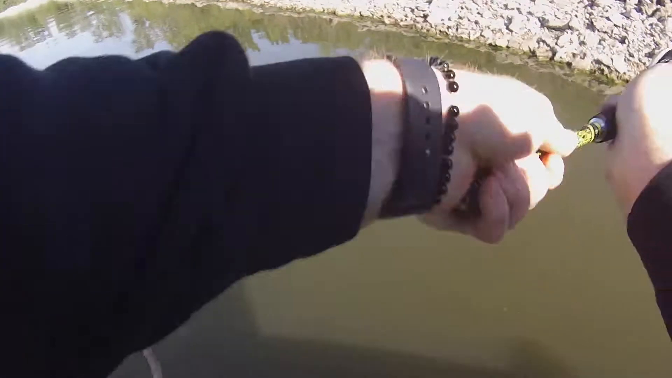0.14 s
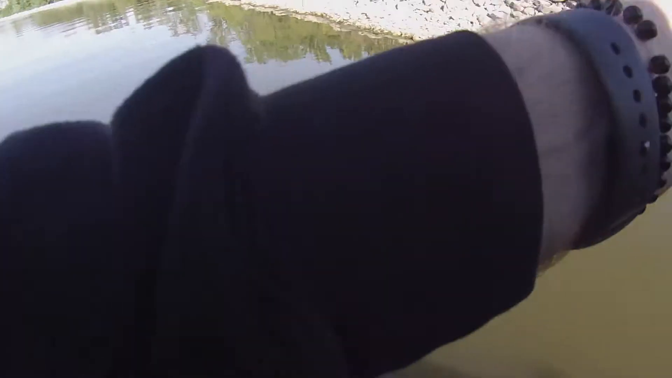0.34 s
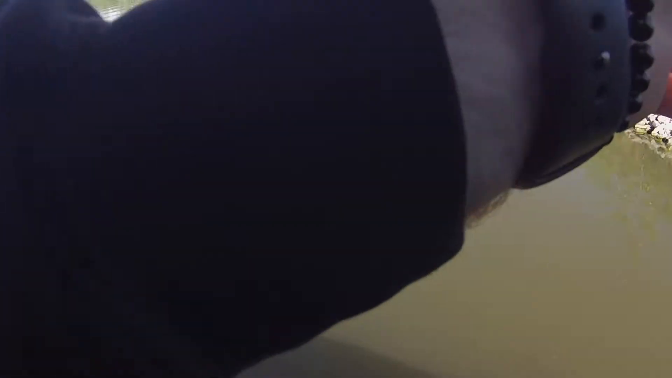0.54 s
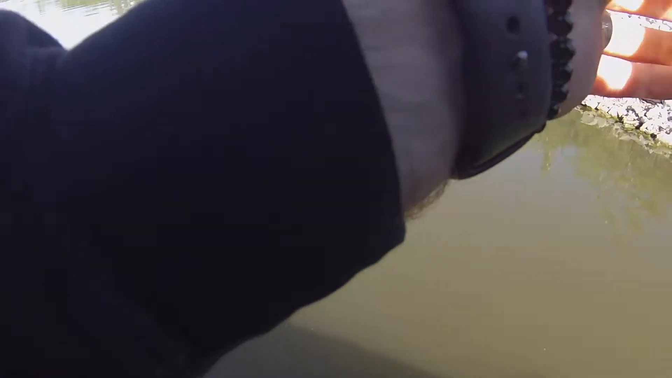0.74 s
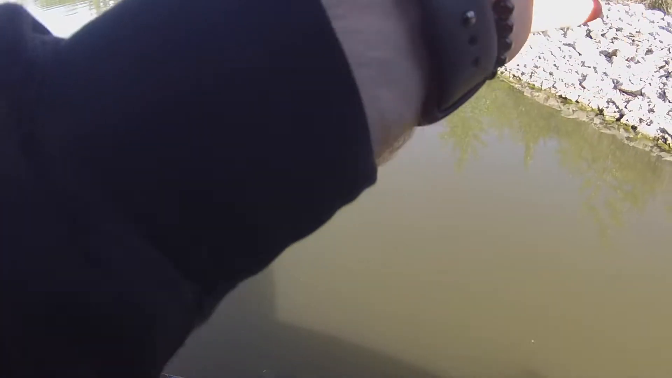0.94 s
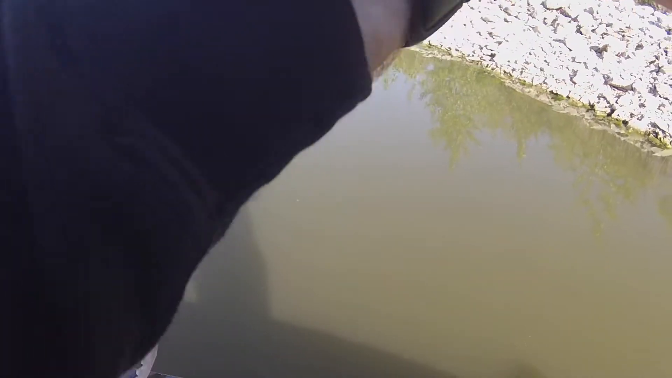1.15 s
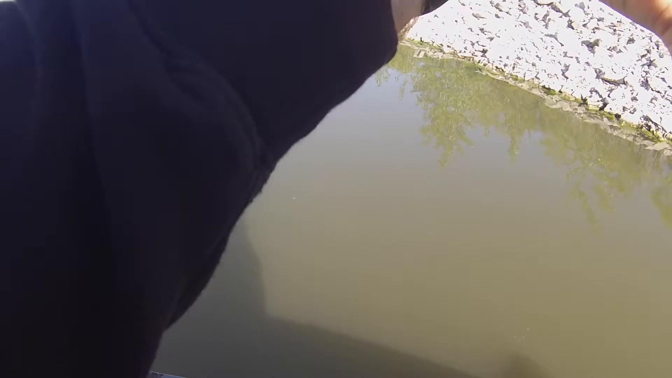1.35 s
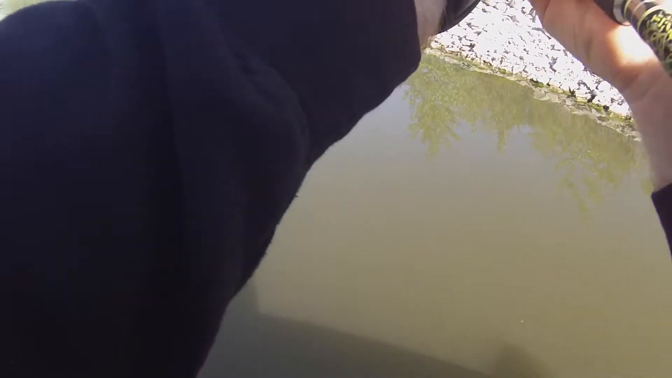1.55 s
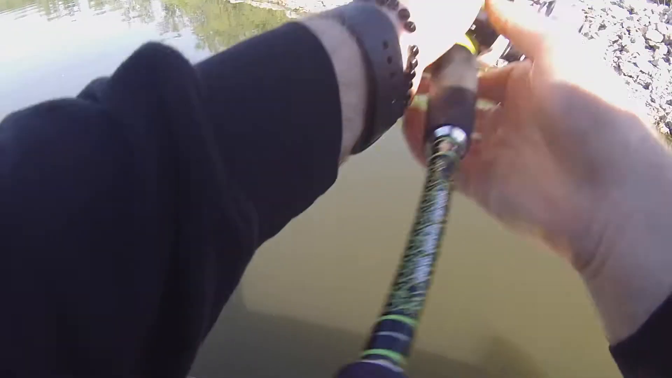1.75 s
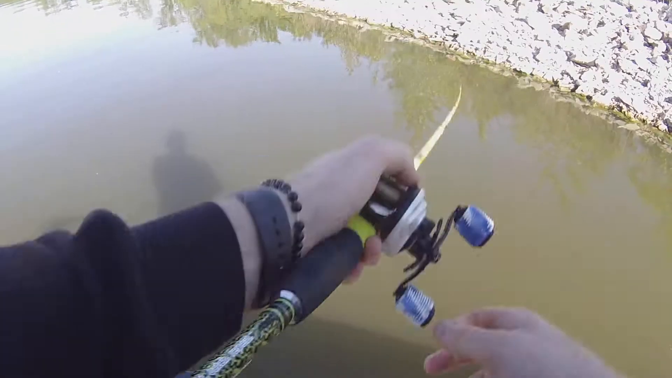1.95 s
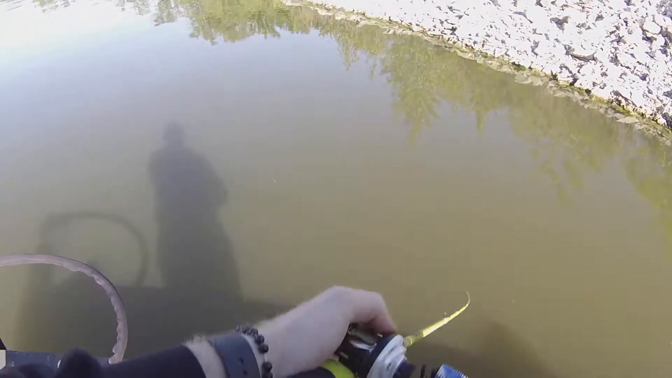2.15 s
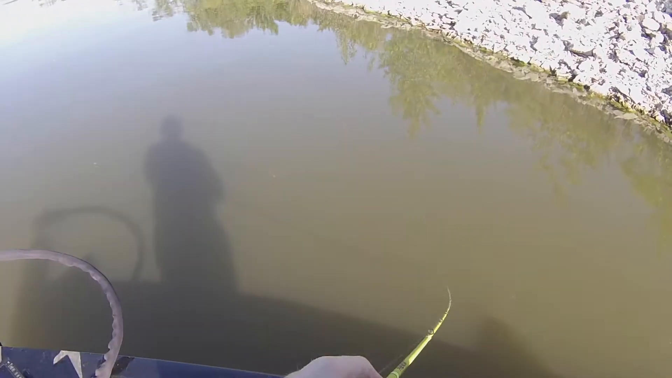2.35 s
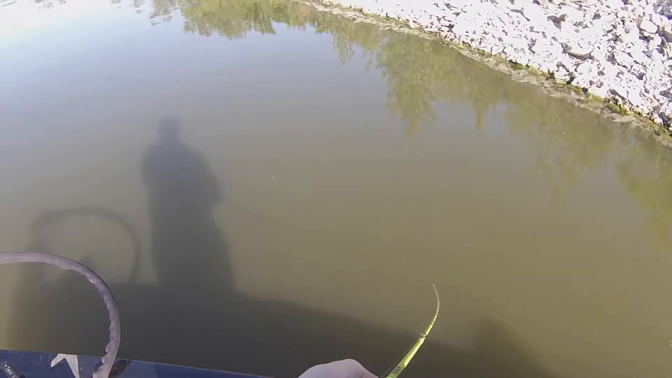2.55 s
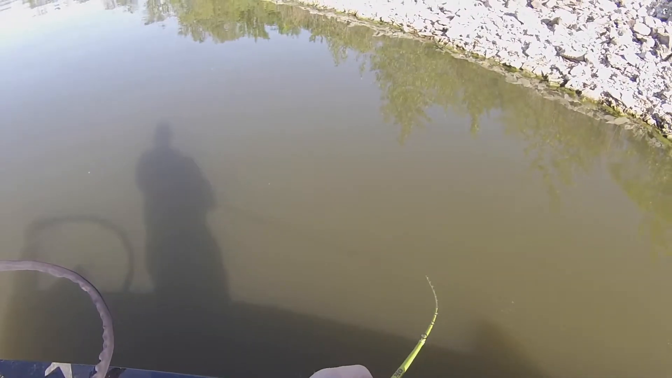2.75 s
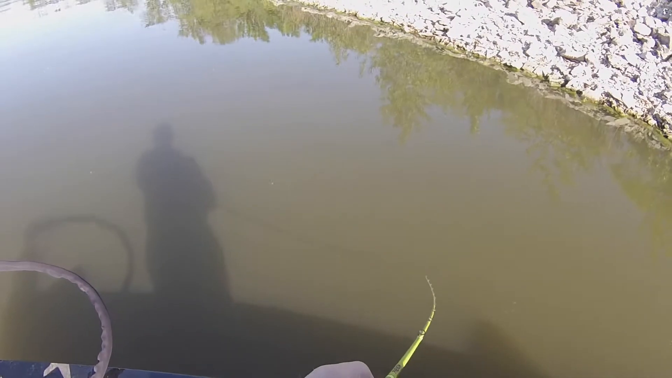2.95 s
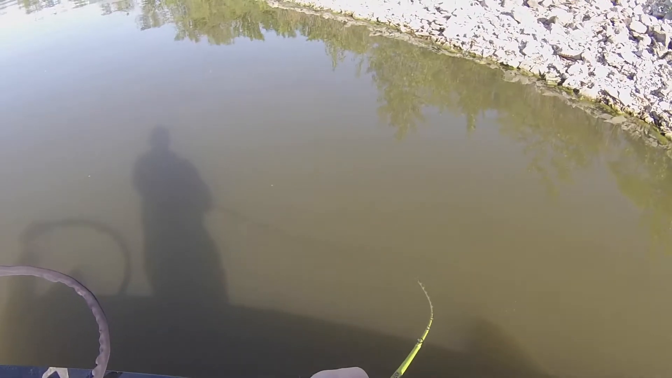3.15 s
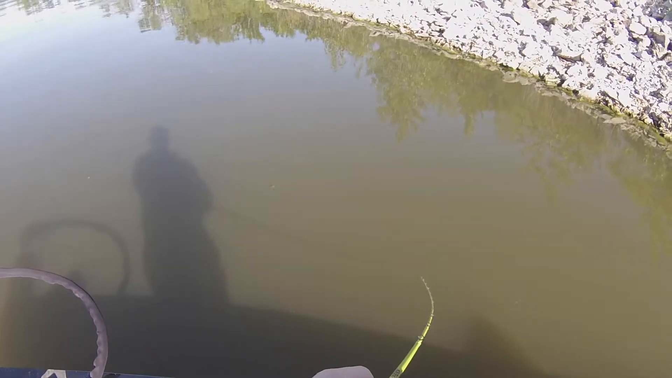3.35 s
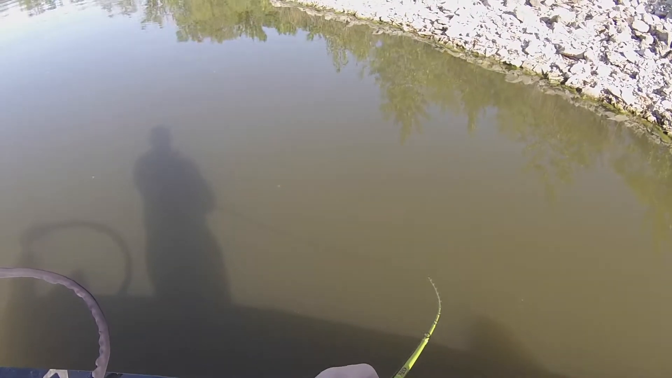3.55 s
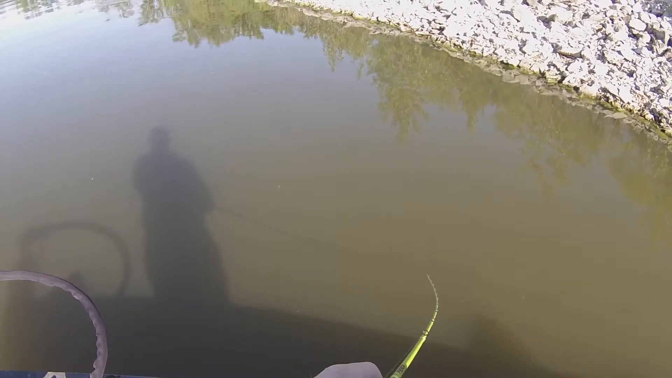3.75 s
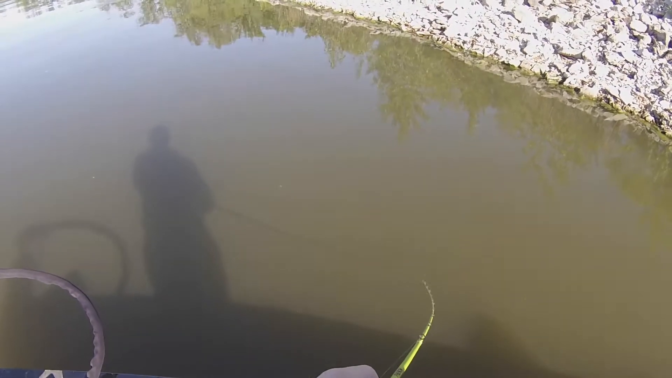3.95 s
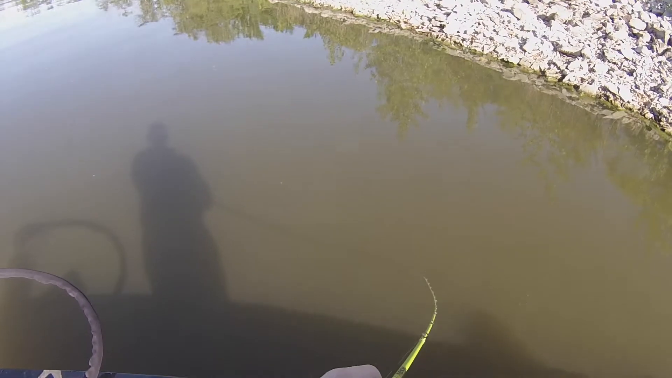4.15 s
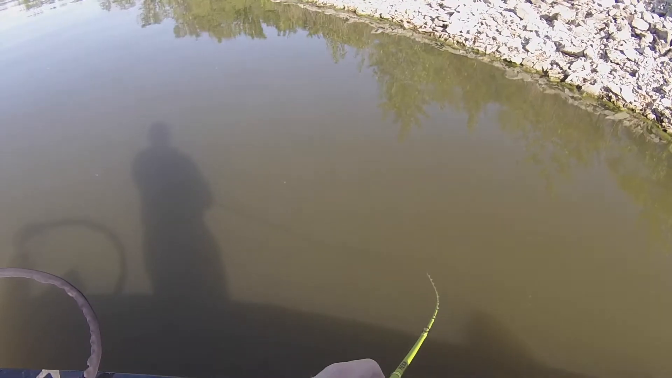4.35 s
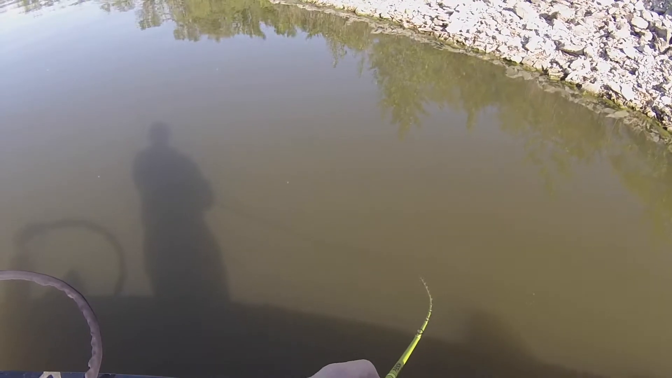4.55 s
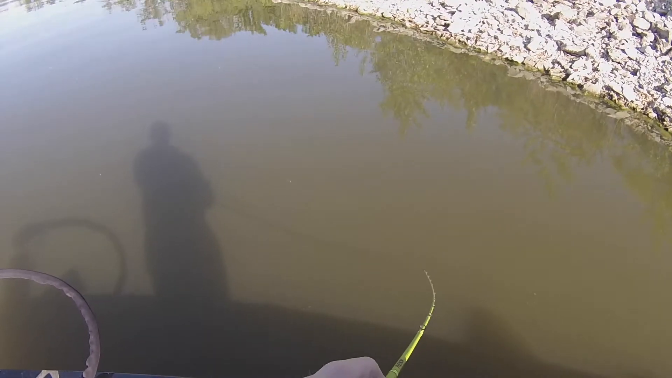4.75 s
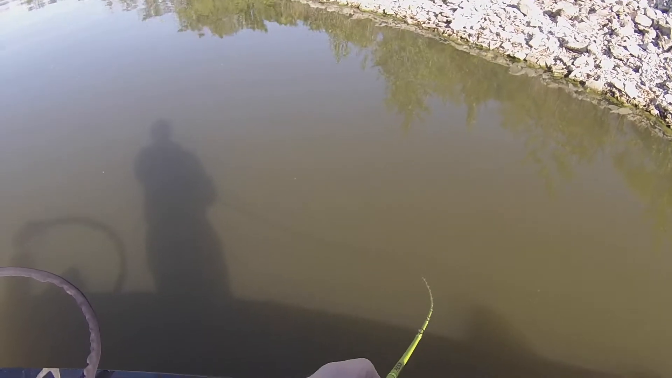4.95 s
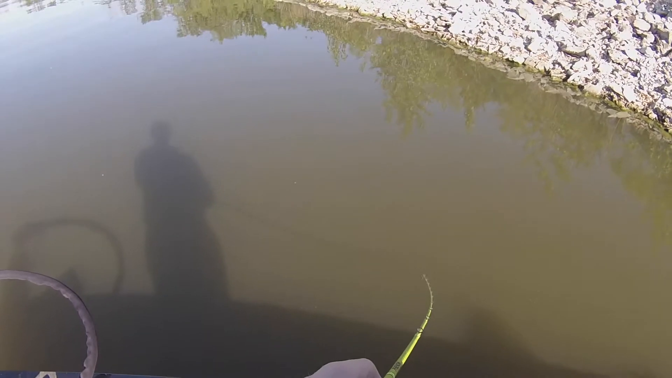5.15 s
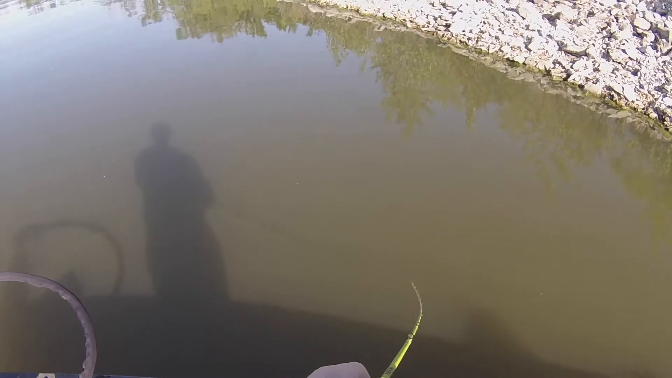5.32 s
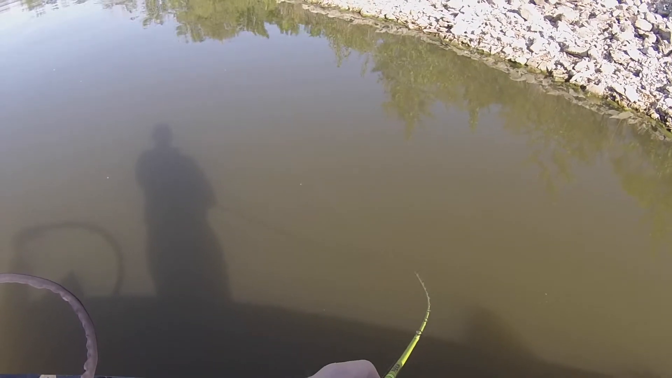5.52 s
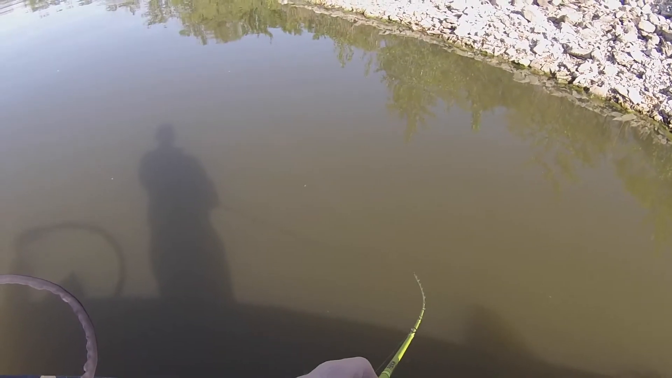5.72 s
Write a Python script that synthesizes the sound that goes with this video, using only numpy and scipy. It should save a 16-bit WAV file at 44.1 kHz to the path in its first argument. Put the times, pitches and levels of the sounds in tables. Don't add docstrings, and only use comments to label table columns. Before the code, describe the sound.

A rod whips and wet line zips out, a reel spool whirs and slows, then a hard metallic clack leads into faint ticking reeling by a lake.

```python
import sys
import numpy as np
from scipy import signal
from scipy.io import wavfile
from scipy.ndimage import uniform_filter1d

SR = 44100
rng = np.random.default_rng(int(sys.argv[2]) if len(sys.argv) > 2 else 0)


def gain_from_db(level_db):
    decades = np.asarray(level_db, float) / 20
    return 10 ** decades


def put_to_file(sound):
    columns = np.atleast_2d(sound).T
    safe = np.clip(columns, -1, 1)
    whole_steps = np.round(safe * 32767)
    wavfile.write(sys.argv[1], SR, whole_steps.astype(np.int16))


N = 259308


def rms_one(x):
    return x / np.sqrt(np.mean(x ** 2) + 1e-20)


def in_time(rows):
    s, *columns = np.transpose(rows)
    t = np.arange(N) / SR
    fade = np.interp(t, [s[0] - .02, s[0], s[-1], s[-1] + .02], [0, 1, 1, 0])
    return [np.interp(t, s, c) for c in columns] + [fade]


def drift(rate):
    r = np.exp(-80 * np.pi * rate / SR)
    slow = signal.lfilter([1], [1, -2 * r, r * r], rng.standard_normal(N // 40 + 2002))[2000:]
    return np.interp(np.arange(N) / 40, np.arange(len(slow)), rms_one(slow))


def lowpass(x, order, hz):
    return signal.sosfilt(signal.butter(order, hz, fs=SR, output="sos"), x)


def highpass(x, order, hz):
    return signal.sosfilt(signal.butter(order, hz, "high", fs=SR, output="sos"), x)


def band(x, low_hz, high_hz):
    return signal.sosfilt(signal.butter(2, [low_hz, high_hz], "band", fs=SR, output="sos"), x)


def resonate(x, peaks):
    out = 0
    for k, (hz, width, db) in enumerate(peaks):
        r = np.exp(-np.pi * abs(width) / SR)
        top = (1 - r * r) / 2 * np.array([1, 0, -1])
        ring = signal.lfilter(top, [1, -2 * r * np.cos(2 * np.pi * hz / SR), r * r], x)
        out = out + (-1) ** k * gain_from_db(db) * ring
    return out


def coloured(source, spectrum, patchy_db):
    hz, db = np.transpose(spectrum)
    out, together = 0, drift(1.5)
    edges = 18 * 2 ** np.arange(0, 10.1, 1 / 3)
    for k, (low, high) in enumerate(zip(edges, edges[1:])):
        level = np.interp(np.log(low * high) / 2, np.log(hz), db)
        if level > -50:
            flicker = patchy_db * (.5 * together + drift(8.5))
            out = out + gain_from_db(level + flicker) * band(source[k % 2], low, high)
    return rms_one(out)


def gliding(hz, half_width_hz):
    phase = 2 * np.pi * np.cumsum(hz) / SR
    a, b = lowpass(rng.standard_normal((2, N)), 2, half_width_hz)
    return rms_one(a * np.cos(phase) + b * np.sin(phase))


def struck(modes, burst, spread_db):
    t = np.arange(3000) / SR
    hz, db, t60 = np.transpose(modes)[:, :, None]
    luck = rng.standard_normal((2, len(modes), 1))
    decay = gain_from_db(db + spread_db * luck[0] - 60 * t / t60)
    rings = decay * np.sin(2 * np.pi * hz * (1 + .012 * luck[1]) * t)
    sound = signal.fftconvolve(burst, rings.sum(axis=0))
    return sound / np.max(np.abs(sound))


def add(out, sound, s):
    i = round(s * SR)
    out[i:i + len(sound)] += sound[:N - i]


# [f/Hz, level/dB per Hz]
LAKE_COLOUR = [(20, -10.5), (66, 1.5), (252, -0.5), (580, -9.5), (2850, -17.5), (3550, -26), (4400, -22),
               (15500, -30)]


def lake():
    return gain_from_db(-48.5) * coloured(rng.standard_normal((2, N)), LAKE_COLOUR, patchy_db=.7)


# [t/s, length/s, level/dB]
CALLER = [(1.074, 0.047, -60), (1.147, .2, -74), (1.367, 0.17, -64), (3.197, 0.087, -51),
          (3.363, 0.11, -59), (5.131, 0.058, -59), (5.255, 0.088, -55.5), (5.428, 0.048, -57)]
# [t/s, length/s, f/Hz, level/dB]
NOTES = [(0.114, 0.023, 1230, -51), (3.102, 0.053, 1080, -56), (3.219, .05, 4150, -66.5),
         (4.22, 0.044, 1250, -62), (4.234, 0.041, 2350, -60), (4.337, .1, 2350, -66),
         (4.383, 0.027, 1325, -59), (4.489, 0.084, 2320, -65), (5.24, 0.031, 1170, -63),
         (5.661, 0.055, 1605, -55), (2.98, .05, 1385, -63), (5.27, .05, 2060, -66)]
# [t/s, length/s, start f/Hz, end f/Hz, level/dB]
WARBLE = [(3.23, .05, 3450, 3400, -68), (4.15, 0.054, 3700, 3580, -67), (4.28, .05, 3200, 3260, -69),
          (4.88, .04, 2960, 2950, -68), (5.14, .06, 2800, 2920, -68), (4.382, .05, 2610, 2650, -67),
          (4.51, 0.054, 3560, 3510, -67), (4.56, .045, 3450, 3020, -66), (4.63, .06, 2640, 3010, -66),
          (4.68, 0.035, 3100, 3160, -66), (4.76, .04, 3720, 3660, -66), (4.79, .035, 3660, 3330, -65),
          (4.815, .04, 3330, 3780, -65), (5.02, .06, 3230, 3150, -69), (5.25, 0.067, 3300, 3100, -67),
          (5.47, .09, 3470, 3510, -68), (5.776, 0.038, 3200, 3060, -62)]
CALLER_HZ, SAG = 1365, .95
FLOCK_DB = -60.5


def birds():
    out, shimmer = np.zeros(N), drift(50)
    notes = NOTES + [(s, length, CALLER_HZ, db) for s, length, db in CALLER]
    sagging = [(s, length, hz, None, db) for s, length, hz, db in notes]
    for s, length, start_hz, end_hz, db in WARBLE + sagging:
        u = np.linspace(0, 1, round(length * SR))
        rough = 1 + 0.25 * shimmer[round(s * SR):][:len(u)]
        if end_hz:
            hz = start_hz + (end_hz - start_hz) * u
        else:
            hz = start_hz * (1 + (SAG - 1) * u ** 4)
        swell = np.minimum(u / .15, 1) * (1 - u) ** .4
        add(out, gain_from_db(db + 7.5) * rough * swell * np.sin(2 * np.pi * np.cumsum(hz) / SR), s)
    for lag, db in [(.023, -19.5), (.051, -16.5), (.087, -16)]:
        add(out, gain_from_db(db) * out.copy(), lag)
    flock = rms_one(resonate(rng.standard_normal(N), [(1300, 110, 0), (2300, 200, -9), (677, 60, -5)]))
    return out + gain_from_db(FLOCK_DB + 2 * drift(11)) * flock


# [t/s, level/dB, rise/s per 20 dB, fall/s per 20 dB]
GUSTS = [
    (0.0, -34, .03, .03),
    (.15, -36, .1, .04),
    (.59, -56, .06, .05),
    (1.07, -55, .18, .4),
    (1.31, -40, .07, .09),
    (1.57, -47, .06, .13),
    (2.14, -56, .6, .1),
]
# [t/s, level/dB]
HULL_HUM = [(.9, -75), (1.05, -54), (1.3, -53), (1.42, -64)]
CALM_DB = -67


def buffet():
    t = np.arange(N) / SR
    gusts = gain_from_db(CALM_DB) * (t < 2.2)
    for s, db, rise, fall in GUSTS:
        gusts = gusts + gain_from_db(db - 20 * np.where(t < s, (s - t) / rise, (t - s) / fall))
    hum_db, hum_fade = in_time(HULL_HUM)
    hull = rms_one(resonate(rng.standard_normal(N), [(182, 6, 0)]))
    return gusts * rms_one(band(rng.standard_normal(N), 15, 48)) + hum_fade * gain_from_db(hum_db) * hull


# [t/s, level/dB]
WINDING = [(1.9, -72), (2.3, -64), (2.7, -59.5), (3.05, -61), (4.07, -63), (4.47, -61), (4.86, -63),
           (5.32, -61), (5.88, -65)]


def winding():
    db, fade = in_time(WINDING)
    return fade * gain_from_db(db + 1.5 * drift(6)) * rms_one(band(rng.standard_normal(N), 1700, 3100))


CRACKLE_PER_S, CRACKLE_DB = 75, -54


def crackle():
    reeling = np.arange(N) > 2.25 * SR
    born = (rng.random(N) < CRACKLE_PER_S * gain_from_db(5 * drift(3)) / SR) * reeling
    sizes = gain_from_db(CRACKLE_DB + 2.8 * np.minimum(rng.exponential(1, N), 3)) * rng.choice([-1, 1], N)
    dealt = rng.integers(0, 3, N)
    out = 0
    for k, hz in enumerate([8200, 10800, 13000]):
        out = out + 6 * resonate(born * sizes * (dealt == k) + 1e-18, [(hz, 2500, 0)])
    return out


# [t/s, peak level/dB, centre f/Hz]
TICKS = [(2.776, -35, 10300), (2.8582, -32.5, 8780), (2.997, -33, 6060), (3.3293, -30, 6310),
         (3.3557, -30, 14000), (3.4174, -30, 13400), (3.5468, -31.5, 8150), (3.6326, -36, 10700),
         (3.6478, -29, 13900), (3.6912, -34, 10100), (3.7723, -34.5, 8450), (3.88, -34, 13600),
         (4.1414, -35, 12100), (4.1925, -31, 11100), (4.3274, -29, 11600), (4.4125, -34.5, 10800),
         (4.5042, -27, 10600), (4.524, -31, 9950), (4.681, -35.5, 11600), (4.8074, -37, 6140),
         (5.1756, -31, 11000), (5.2125, -30.5, 8200), (5.222, -30, 8150), (5.2457, -31, 14300),
         (5.3045, -30, 8740), (5.5007, -32, 7700), (5.5355, -32, 11600), (5.5677, -34, 10600),
         (5.6674, -25.5, 8000), (5.7128, -31, 14700)]
FAINT_TICKS = [2.563, 2.9731, 3.0342, 3.1846, 3.3757, 3.404, 3.4734, 3.594, 3.673, 3.8491, 4.0027, 4.036,
               4.0701, 4.104, 4.1783, 4.2297, 4.2826, 4.337, 4.4607, 4.512, 4.535, 4.567, 4.6074, 5.19,
               5.3232, 5.4629, 5.514, 5.55, 5.72, 5.728, 5.759, 5.8036]
FAINT_DB, FAINT_HZ = -37.5, 10500
TICK_DULL_DB = -50


def ticks():
    out, t = np.zeros(N), np.arange(90) / SR
    dull = [(3200, -3, .004), (5000, 0, .003)]
    for s, db, hz in TICKS + [(s, FAINT_DB, FAINT_HZ) for s in FAINT_TICKS]:
        burst = rng.standard_normal(len(t)) * t / .0003 * np.exp(-t / 0.00032)
        snap = [(hz, 0, .002), (7800, -4, .002), (10800, -3, .0015), (13000, -4, .0015),
                (15300, -4, .0015), (16200, -4, .001), (9200, -4, .001), (6000, -13, .001)]
        add(out, gain_from_db(db - 2.0) * struck(snap, burst, spread_db=2), s + .001)
        add(out, gain_from_db(min(TICK_DULL_DB, db - 14)) * struck(dull, burst, spread_db=3), s + .001)
    return out


# [t/s, f/Hz, level/dB]
SLACK = [(2.44, 6000, -80), (2.55, 6300, -68), (2.68, 6600, -70), (2.8, 6200, -74), (2.95, 6000, -82)]


def slack():
    hz, db, fade = in_time(SLACK)
    rub = gliding(hz, 300) + 0.88 * gliding(1.25 * hz, 300) + 0.97 * gliding(1.65 * hz, 300)
    return fade * gain_from_db(db) * rub


# [t/s, level/dB]
RUSTLE = [(0.0, -59), (0.032, -52), (0.166, -50), (0.174, -42), (0.19, -56), (0.198, -49), (0.24, -42)]


def rustle():
    db, fade = in_time(RUSTLE)
    low = band(rng.standard_normal(N), 1040, 4500)
    high = band(rng.standard_normal(N), 6500, 14000)
    return fade * gain_from_db(db + 2.0 * drift(87)) * rms_one(low + .3 * high)


# [t/s, peak level/dB, main ring f/Hz, contact/s, bright part level/dB]
TAPS = [(.158, -36, 2300, 0.0018, -20), (.1705, -33, 2300, 0.0033, -20), (.197, -34, 3400, .002, -4),
        (1.7533, -25, 2960, 0.0018, -4), (1.767, -41, 2600, 0.0023, -15), (1.81, -44, 2080, .002, -9),
        (1.846, -50, 2500, .002, -10), (1.933, -43, 1000, .001, -6), (2.0212, -36, 4100, 0.001, 4),
        (2.028, -40, 2500, .001, -1), (2.045, -47, 3000, .001, 2), (2.366, -41, 12000, .0003, -6),
        (2.384, -40, 6400, .005, -30), (2.39, -39, 10900, .003, -30)]


def taps():
    out, t = np.zeros(N), np.arange(400) / SR
    edge = [(4650, 0, .003), (6100, 0, .003), (8000, -2, .002), (9800, -3, .002), (12500, -9, .002)]
    for s, db, hz, contact, bright_db in TAPS:
        burst = rng.standard_normal(len(t)) * np.exp(-t / max(contact, 1e-4))
        body = [(hz, 0, .006), (.52 * hz, -5, .008), (.75 * hz, -8, .006), (800, -7, .012)]
        add(out, gain_from_db(db) * struck(body, burst, spread_db=1), s)
        add(out, gain_from_db(db + bright_db) * struck(edge, burst, spread_db=2), s)
    return highpass(out, 2, 400)


# [t/s, peak level/dB, f/Hz, t60/s]
PINGS = [(.0228, -43, 3210, .008), (.0483, -41, 2740, .012), (.0902, -41, 2600, .008),
         (.171, -35, 2270, .04), (.172, -37, 3430, .025), (.171, -40, 3950, .018), (.17, -40, 2600, .015),
         (.197, -37, 3420, .018), (.197, -39, 3050, .015), (1.596, -44, 4250, .015),
         (1.608, -39, 1450, .02), (1.612, -41, 4650, .025), (1.615, -41, 1800, .025),
         (1.754, -39, 800, .03), (1.7545, -37, 1420, .02), (1.764, -42, 1300, .04),
         (1.766, -44, 2750, .012), (1.808, -43, 2100, .015), (1.815, -47, 2700, .012),
         (2.023, -39, 850, .02), (2.092, -38, 2200, .05), (2.1005, -29, 1200, .018), (2.103, -36, 650, .02),
         (2.1178, -17, 3600, .008), (2.118, -26, 850, .02), (2.1228, -10, 1300, .018),
         (2.1232, -12.5, 660, .025), (.234, -30, 1520, .03), (.236, -28, 620, .03), (2.131, -20, 680, .025),
         (2.137, -24, 1600, .015), (2.137, -31, 2200, .015), (2.143, -33, 440, .025),
         (2.388, -41, 8400, .012), (2.6, -48, 3100, .01), (3.19, -48, 4400, .006), (4.003, -46, 4600, .006),
         (4.105, -46, 4300, .01), (4.143, -43, 4500, .006), (4.512, -47, 4200, .01),
         (1.7535, -38, 6000, .008)]
CLACK_S, TAIL_DB, TAIL_T60_S = 2.124, -26, .09


def pings():
    out, t = np.zeros(N), np.arange(N) / SR
    for s, db, hz, t60 in PINGS:
        add(out, gain_from_db(db) * struck([(hz, 0, t60)], np.hanning(7), spread_db=0), s)
    after = (t - CLACK_S).clip(0)
    tail = gain_from_db(TAIL_DB - 60 * after / TAIL_T60_S) * np.minimum(after / .006, 1)
    return highpass(out, 4, 360) + tail * rms_one(band(rng.standard_normal(N), 400, 2400))


# [t/s, vortex f/Hz, level/dB]
WHIP = [
    (.1, 500, -57),
    (.16, 565.6, -52),
    (.19, 715.3, -37),
    (.215, 1009, -34),
    (.235, 1150, -31.5),
    (.25, 914, -39),
    (.29, 589.5, -44),
    (.35, 453, -52),
    (.62, 350.2, -57),
]


def rod():
    hz, db, fade = in_time(WHIP)
    wide = rms_one(band(rng.standard_normal(N), 370, 1800))
    return fade * gain_from_db(db) * (gliding(hz, 130) + .35 * gliding(1.8 * hz, 200) + .7 * wide)


# [t/s, level/dB]
ZIP = [
    (0.18, -50),
    (0.266, -29.5),
    (0.308, -31.5),
    (0.322, -38),
    (0.35, -48),
]
# [f/Hz, level/dB per Hz]
ZIP_COLOUR = [(1800, -27), (2600, -1.5), (5000, -7.5), (8000, 1.5), (11000, -0.5), (13500, -1.5),
              (16000, -5)]


def line_zip():
    db, fade = in_time(ZIP)
    sizes = gain_from_db(3 * np.minimum(rng.exponential(1, (2, N)), 5)) * rng.choice([-1, 1], (2, N))
    snaps = rms_one(sizes * (rng.random(N) < 2500 / SR))
    rip = snaps + 0.95 * rng.standard_normal((2, N))
    return fade * gain_from_db(db) * coloured(rip, ZIP_COLOUR, patchy_db=2.5)


# [t/s, peak level/dB, low body re bright/dB, contact/s, dull above f/Hz]
KNOCKS = [(2.093, -34, -16, 0.0028, 6000), (2.1003, -20, -18, 0.00073, 4500),
          (2.1134, -19, -10, .0006, 14000), (2.1143, -27, -6, .0006, 10000),
          (2.1176, -8, -17, 0.00048, 6050), (2.1187, -5.5, -20, 0.00049, 13000),
          (2.1224, -5.5, -24, 0.00067, 15000), (2.1231, 0, -26, 0.00089, 10200),
          (2.1249, -11, -14, .0008, 14100), (2.127, -12, -13, 0.00074, 9000),
          (2.1316, -30, 0, 0.0014, 10000), (2.1373, -23, -6, .0008, 14000), (2.194, -45, -17, 0.0054, 9000)]
# [t/s, peak level/dB, contact/s]
SNAPS = [
    (0.1704, -33, .0005),
    (.2, -42, .001),
    (.2355, -36, .0004),
    (.3005, -22, 0.00025),
    (0.307, -27, 0.00034),
    (1.334, -37, .003),
    (1.342, -38, 0.0024),
    (1.356, -37, .002),
    (1.596, -39, 0.0028),
    (1.815, -47, 0.00061),
]
# [f/Hz, level/dB, t60/s]
BODY = [(420, -20, .03), (658, 7, 0.03), (790, 7, 0.035), (965, 4, 0.035), (1170, 11, 0.016),
        (1302, 14, 0.018), (1480, 12, 0.016), (1960, 2, 0.02), (2200, 3, 0.02), (2700, -1, 0.012)]
# [f/Hz, level/dB, t60/s]
METAL = [(3560, -11, 0.0047), (3870, -1.5, .006), (4550, 7, 0.005), (5200, 4, 0.0048), (6020, -1.5, 0.0054),
         (6700, 0, 0.0066), (7620, 2.5, .008), (8710, 9, 0.0055), (9680, 5.5, .006), (11300, 1, .005),
         (12180, -2, 0.0033), (13600, -2, .004), (15000, -10, .004)]
SNAP_BODY_DB, SNAP_TOP_HZ = -27, 14000


def knocks():
    out, t = np.zeros(N), np.arange(900) / SR
    snaps = [(s, db, SNAP_BODY_DB, contact, SNAP_TOP_HZ) for s, db, contact in SNAPS]
    for s, db, low_db, contact, top_hz in KNOCKS + snaps:
        decay = np.exp(-t / max(contact, 1e-4)) + .06 * np.exp(-t / 0.0046)
        burst = rng.standard_normal(len(t)) * decay * np.minimum(t / 0.00014, 1)
        soft = lowpass(burst, 2, min(top_hz, 18000))
        add(out, gain_from_db(db) * struck(METAL, soft, spread_db=3), s)
        thud = np.exp(-t / .0001) + .2 * burst
        add(out, gain_from_db(db + low_db) * struck(BODY, thud, spread_db=2), s)
    return highpass(out, 6, 450)


# [f/Hz, width/Hz, level/dB]
FRAME = [(1720, 300, 0.5), (3050, 600, -2.5), (1320, 140, 4), (2300, 1500, -2)]
PLATE = [(4510, 1500, 15), (5540, 500, 0)]
RIM = [(8400, 3600, 25), (6800, 900, -11), (10300, 1800, 2), (12200, 1200, 8)]
LINE_HISS = [(12400, 1300, 2), (14900, 1300, 0)]
# [level at top speed/dB, loss/dB per octave of speed, launch/dB,
# loss to the thumb/dB, gain per line surge/dB]
WHIR_PARTS = [
    (-47.5, .5, 3.5, 1.5, 1.5),
    (-48, 1.1, 3, 12, 0.1),
    (-45, 5.0, -2, 14, 3.5),
    (-56.5, 3.2, -3, 6, 7),
]
# [t/s, frame f/Hz, side plate f/Hz]
RIDGES = [(.3, 2500, 4650), (.66, 2330, 4850), (.82, 2380, 4250), (.97, 2200, 4350), (1.05, 2250, 4550),
          (1.2, 2200, 4350), (1.6, 2400, 4300)]
# [multiple, level/dB]
WHINE = [(17.8, -57), (36, -50.5), (54, -54), (71.5, -62)]
# [f/Hz, width/Hz, level/dB]
WHINE_PATH = [(2300, 1200, 0), (3050, 400, -4), (4500, 900, -2)]
RELEASE_S, WHIR_FROM_S, TOP_S, STOP_S = .2, .28, .33, 1.575
RELEASE_HZ, TOP_HZ, CRAWL_HZ, SLOWING_S = 272, 292, 30, .45
THUMB_FROM_S, THUMB_STOP_S = 1.05, .06
LAUNCH_S, SURGES_S, SURGE_WIDTH_S = .06, [.374, .58], .035
HUM_DB, HUM_DB_PER_OCTAVE, HUM_RISE_DB_PER_S = -45, 18, 90
HUM_ORDERS_DB = [-1, 0, -12, -9, -9, 3, -10, -12, -4, -2]
HUM_DULLS_DB = 3.0
TICK_DB, TICK_DB_PER_OCTAVE = -41, 6.0
RATTLE_HZ, RATTLE_DB = (178, 236), 14


def spool():
    t = np.arange(N) / SR
    slowing_hz = CRAWL_HZ + (TOP_HZ - CRAWL_HZ) * np.exp(-(t - TOP_S).clip(0) / SLOWING_S)
    spin_up_hz = np.interp(t, [RELEASE_S, TOP_S], [RELEASE_HZ, TOP_HZ])
    turns_hz = np.where(t < TOP_S, spin_up_hz, slowing_hz)
    octaves = np.log2(TOP_HZ / slowing_hz)
    phase = np.cumsum(turns_hz * (1 + 0.011 * drift(30))) / SR

    launch = np.exp(-(t - WHIR_FROM_S).clip(0) / LAUNCH_S)
    thumb = np.interp(t, [THUMB_FROM_S, STOP_S], [0, 1])
    surge = sum(np.exp(-((t - s) / SURGE_WIDTH_S) ** 2) for s in SURGES_S)
    free = np.interp(t, [STOP_S - THUMB_STOP_S, STOP_S + .02], [1, 0])

    frame_hz, plate_hz, _ = in_time(RIDGES)
    ridges = [.8 * gliding(frame_hz, 200), .7 * gliding(plate_hz, 300), 0, 0]
    throbs = [.42, .25, .12, .2]
    whir = 0
    for peaks, ridge, row, throb in zip([FRAME, PLATE, RIM, LINE_HISS], ridges, WHIR_PARTS, throbs):
        top_db, octave_db, launch_db, thumb_db, surge_db = row
        db = top_db - octave_db * octaves + launch_db * launch - thumb_db * thumb + surge_db * surge
        rub = rng.standard_normal(N)
        part = rms_one(rms_one(resonate(resonate(rub, peaks), peaks)) + ridge)
        once_a_turn = 1 + throb * np.cos(2 * np.pi * phase)
        whir = whir + gain_from_db(db + 0.7 + 1.13 * drift(7.6)) * part * once_a_turn

    low_hz, high_hz = RATTLE_HZ
    rattle = np.interp(slowing_hz, [low_hz - 10, low_hz, high_hz, high_hz + 10], [0, 1, 1, 0])
    tick_db = TICK_DB - TICK_DB_PER_OCTAVE * octaves + RATTLE_DB * rattle - 30 * thumb
    new_turn = np.diff(np.floor(phase), prepend=0) > 0
    pulses = new_turn * gain_from_db(tick_db + rng.normal(0, 1.2, N))
    tick = resonate(pulses + 1e-18, [(8900, 800, 13), (10300, 1200, 17), (5170, 900, 8)])

    hum = 0
    for k, db in enumerate(HUM_ORDERS_DB):
        level = gain_from_db(db - HUM_DULLS_DB * k * octaves + 2.9 * drift(14))
        hum = hum + level * np.sin(2 * np.pi * (k + 1) * phase)
    hum_db = HUM_DB - HUM_DB_PER_OCTAVE * octaves - HUM_RISE_DB_PER_S * (TOP_S - t).clip(0)

    whine = sum(gain_from_db(db) * gliding((order * turns_hz).clip(0, 15000), 50) for order, db in WHINE)
    whine = resonate(resonate(whine, WHINE_PATH), WHINE_PATH)
    whir_on = np.interp(t, [WHIR_FROM_S - .02, WHIR_FROM_S], [0, 1])
    return free * ((whir + whine + tick) * whir_on + hum * gain_from_db(hum_db) * (t > RELEASE_S))


def scene():
    distance = lake() + birds()
    boat = buffet() + rustle() + rod() + line_zip()
    reeling = winding() + crackle() + ticks() + slack()
    reel = taps() + pings() + knocks() + spool()
    return (distance + boat + reeling + reel)[None]


def low_pass(x):
    return signal.sosfilt(signal.butter(12, 16470, fs=SR, output="sos"), x)


def record(dry):
    cut = signal.sosfiltfilt(signal.ellip(12, .1, 60, 15380, fs=SR, output="sos"), dry)
    power = highpass(dry, 2, 6000) ** 2
    sudden = uniform_filter1d(power, size=64) > 18 * uniform_filter1d(power, size=2048)
    near_click = np.minimum(30 * uniform_filter1d(sudden * 1., size=200), 1)
    gate = uniform_filter1d(near_click, size=150)
    open_top = cut + gain_from_db(-8) * gate * (dry - cut)
    return low_pass(1.4 * np.tanh(open_top / 1.42))


dry = scene()
out = record(dry)
put_to_file(out)
```